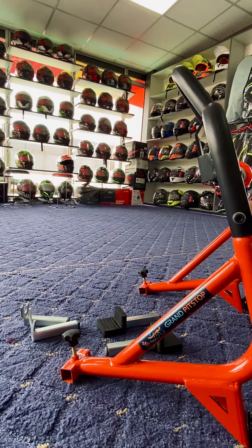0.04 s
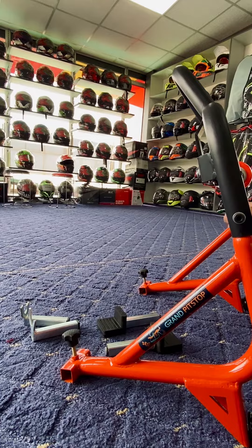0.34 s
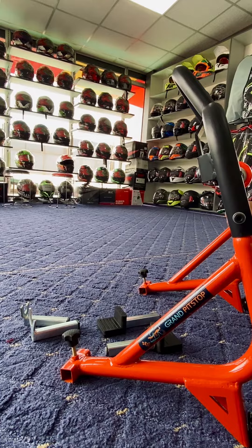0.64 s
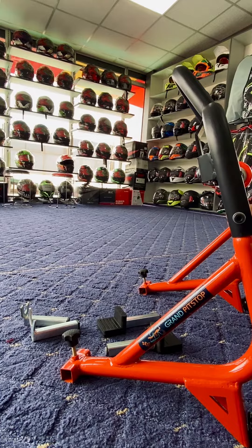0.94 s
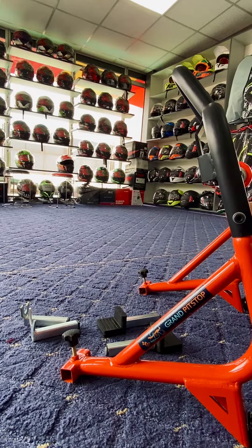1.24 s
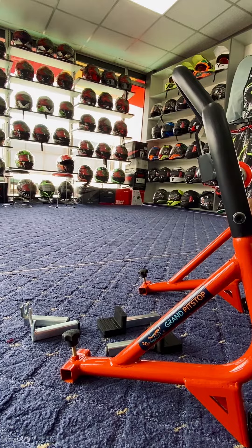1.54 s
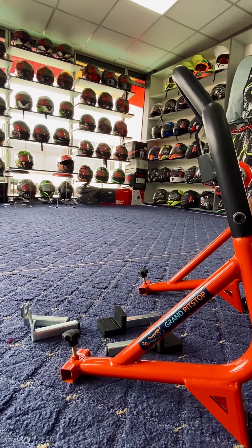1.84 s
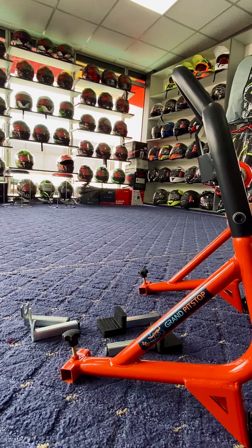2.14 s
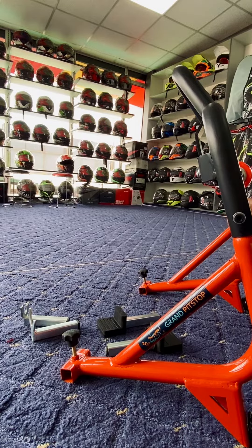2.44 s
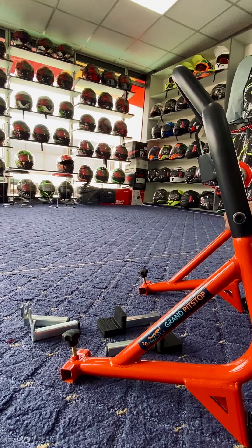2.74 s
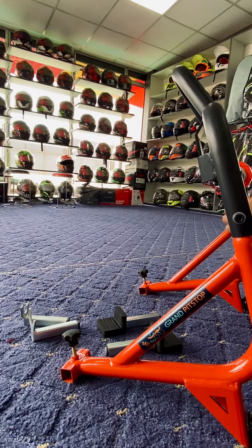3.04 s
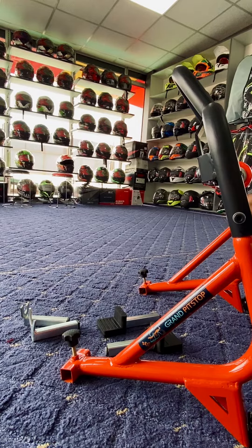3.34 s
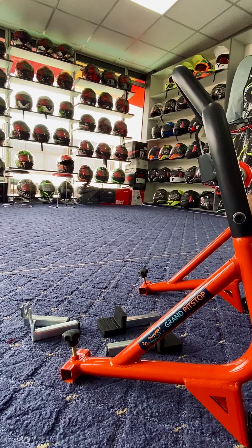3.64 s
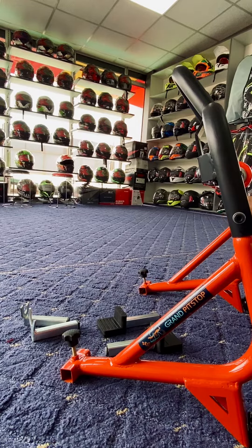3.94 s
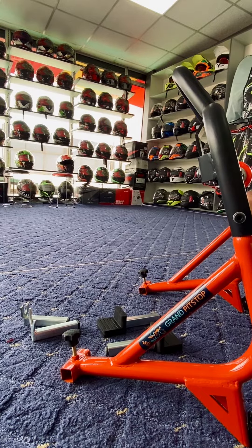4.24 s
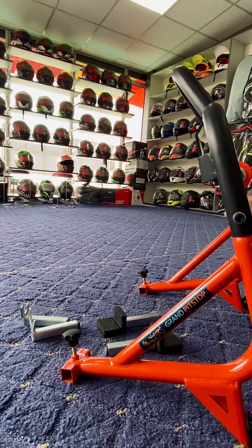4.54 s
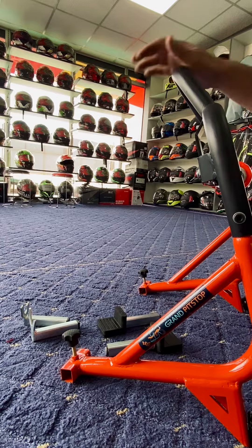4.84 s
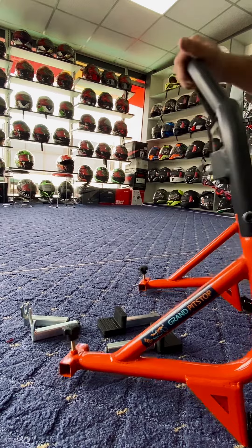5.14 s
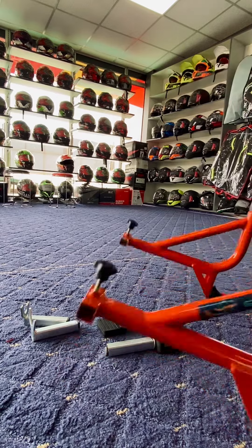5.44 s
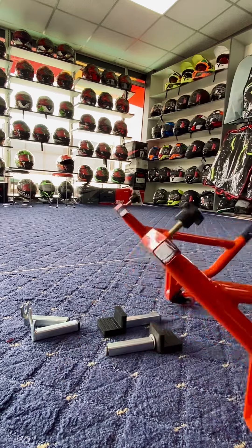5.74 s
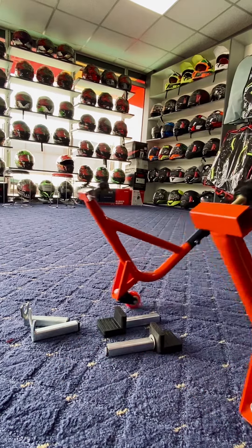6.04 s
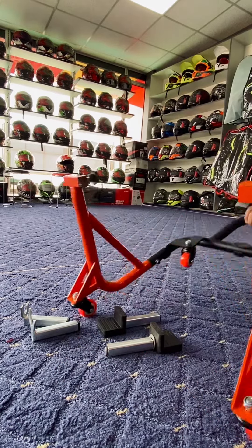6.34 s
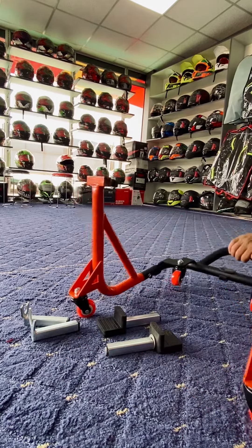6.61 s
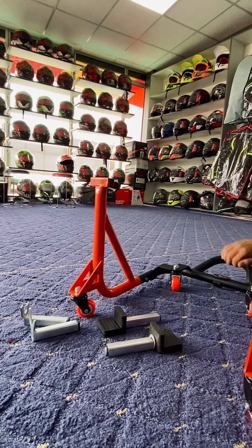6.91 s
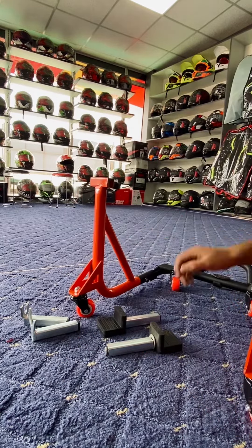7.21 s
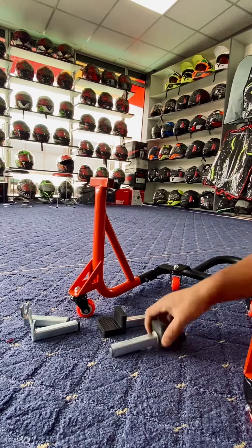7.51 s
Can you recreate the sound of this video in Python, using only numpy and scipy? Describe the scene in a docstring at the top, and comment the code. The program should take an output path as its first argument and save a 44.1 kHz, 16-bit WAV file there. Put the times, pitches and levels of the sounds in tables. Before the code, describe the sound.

Ventilation rumbles steadily in a carpeted shop while a steel stand is handled close to a low microphone, each sound with a brief room echo. A metal sleeve clinks lightly on its tube at about 0.3 and 0.6 seconds, then something soft swishes over the carpet. From 2.7 to 3.6 seconds the sleeve makes three short, gritty scrapes with faint clinks. A soft floor rumble builds from about 4 seconds, and a small pin chinks near 4.9. From 5.2 to 5.8 a dry joint gives a thin, high squeak. Between 5.5 and 6 seconds the frame is set down with hollow knocks, sharp clicks, chattering fittings and a low floor boom, loudest at 5.7. A fainter squeak runs from 6.4 to 7.3, with two lighter knocks around 6.7 and faint carpet brushing. The pin chinks brightly several times from 7.4 to 7.7 seconds.

```python
"""Handling a steel stand

Steel parts are handled on a carpeted shop floor, close to a phone standing low down. A sleeve clinks and
scrapes on its tube, something soft brushes the carpet, a small pin chinks and a dry joint squeaks.
The frame is set down: its tubes knock, its fittings chatter and the floor booms.
Ventilation rumbles throughout, and the room answers each sound briefly."""
import sys
import numpy as np
from scipy import signal
from scipy.fft import rfft, irfft
from scipy.io import wavfile

SR = 44100
rng = np.random.default_rng(int(sys.argv[2]) if len(sys.argv) > 2 else 0)


def pcm_store(signal):
    """Save signal as 16-bit PCM."""
    levels = np.round(np.clip(np.atleast_2d(signal), -1, 1) * 32767)
    wavfile.write(sys.argv[1], SR, levels.astype(np.int16).T)


N = 342657
T = np.arange(N) / SR
F = np.maximum(np.arange(N // 2 + 1) * SR / N, 1)

# The notes the sleeve rings at: pitch_hz, level_db, fade_s (time to fall by 60 dB)
SLEEVE_NOTES = [(2350, -11, .025), (2700, -15, .025), (3970, -8, .035), (4250, -8, .03), (4560, -4, .025),
                (4970, -7.5, .04), (5430, -11, .03), (6350, -10, .03), (6950, -6.5, .15), (7600, -7, .05),
                (8540, -3, .035), (8900, -6, .03), (9330, -3, .035), (9705, -1, .06), (9860, -8, .05),
                (10430, -11, .06), (10700, -7, .035), (11460, -13, .03)]
# The tone of steel touching steel: pitch_hz, level_db
STEEL_TONE = [(400, -29), (1200, 1.5), (2500, 8.5), (3300, -0.5), (4300, 7), (6000, 7), (8000, 6.5),
              (9500, -1), (11000, 7.5), (12200, -13), (14000, -8), (15500, -28)]
# The frame lands, tubes first, then joints, then its full weight:
# start_s, knock_db, joint_delay_s, crack_db, chatter_db, weight_delay_s, thump_db
TOUCHDOWNS = [(5.564, -29.5, 0.014, -23, -41, 0.016, -20.5), (5.6975, -20.3, .002, -34, -42, .013, -11),
              (5.992, -43, 0.00151, -23.5, -62, 0.0033, -28),
              (6.683, -34.5, 0.00094, -48, -41, 0.0179, -26),
              (6.728, -35.5, 0.0023, -25.5, -49, 0.0224, -30.5)]


def undb(db):
    """Turn decibels into a gain."""
    return 10 ** (np.asarray(db) / 20)


def unit(x):
    """Scale to an average (rms) level of one."""
    return x / np.sqrt(np.mean(x ** 2))


def shape(points):
    """Join (pitch_hz, level_db) points into a tone curve."""
    hz, db = np.transpose(points)
    return np.interp(np.log(F), np.log(hz), db)


def noise(db):
    """Noise of level one with the given tone curve."""
    return unit(irfft(rfft(rng.standard_normal(N)) * undb(db), N))


def wander(rate_hz):
    """A smooth random wobble, changing about rate_hz times a second."""
    return noise(-20 * np.log10(1 + (F / rate_hz) ** 4))


def add(track, start_s, sound):
    """Mix a sound into a track."""
    i = int(start_s * SR)
    track[i:i + len(sound)] += sound[:N - i]


def fade(fade_s):
    """A one-second curve that falls by 60 dB every fade_s."""
    return np.exp(-np.log(1000) * T[:SR] / fade_s)


def burst(source, fade_s):
    """A random stretch of a noise, dying away."""
    i = rng.integers(N - SR)
    return source[i:i + SR] * fade(fade_s)


def ring(notes, tilt_db=0, scatter_db=0, scatter_rad=0):
    """A struck part rings; each hit can vary its notes' levels and phases. tilt_db brightens per octave."""
    out = 0
    for (hz, db, fade_s), (size, turn) in zip(notes, rng.standard_normal((len(notes), 2))):
        gain = undb(db + tilt_db * np.log2(hz / 9000) + scatter_db * size)
        out = out + gain * fade(fade_s) * np.sin(2 * np.pi * hz * T[:SR] + scatter_rad * turn)
    return out


def swells(strokes):
    """The strength of sliding strokes that gather speed and ease off."""
    return sum(undb(db) * np.interp(T, [start, peak, end], [0, 1, 0]) for start, peak, end, db in strokes)


def bounces(start_s, db, gap_s, shrink, step_db, count):
    """A blow and its rebounds, each sooner and weaker than the last: start_s, level_db."""
    return [(start_s + gap_s * np.sum(shrink ** np.arange(k)), db + k * step_db) for k in range(count)]


def clinks(hits, notes, tick_fade_s):
    """Steel on steel: a short contact tick and the ring of the part."""
    out, contact = np.zeros(N), 2 * noise(shape(STEEL_TONE))
    for start_s, db, tilt_db, tick_db in hits:
        body = ring(notes, tilt_db, scatter_db=2, scatter_rad=2)
        add(out, start_s, undb(db) * (body + undb(tick_db) * burst(contact, tick_fade_s)))
    return out


def ventilation(split_hz=150, lag_samples=12):
    """A steady duct rumble, alike on both sides, under a wide rush of air that hardly wavers."""
    # The tone of the steady background hiss, with almost nothing above 12.5 kHz: pitch_hz, level_db
    background_tone = [(20, -37), (40, -10), (52, -3), (66, 3), (95, -1), (125, -3), (165, -8.5),
                       (220, -10.5), (330, -20), (520, -18), (850, -21.5), (1300, -26), (2600, -32.5),
                       (5500, -42), (9500, -50), (12000, -50), (13000, -68), (15500, -63)]
    # Pitches the duct boosts: pitch_hz, width_hz, boost_db
    duct_peaks = [(57.1, 15.8, 7), (378.6, 121, 8), (670, 5.5, 4), (826, 13.7, 10.5)]
    # How wide the air sounds (side against middle): pitch_hz, side_db
    air_width = [(60, -27), (110, -55), (200, -10.5), (400, -1), (800, -1), (2400, 1), (8000, -2)]
    # How much louder the left is: pitch_hz, left_minus_right_db
    air_balance = [(60, -1), (110, 0), (200, -2.5), (380, 0.5), (700, 1.5), (1290, 2.5), (2380, 1),
                   (4400, 3), (8120, -2), (15000, 0)]
    peaks = sum(db / (1 + (2 * (F - hz) / width) ** 2) for hz, width, db in duct_peaks)
    middle, side = rfft(rng.standard_normal((2, N))) * undb(shape(background_tone) + peaks)
    sign = np.array([[1], [-1]])
    air = middle + sign * side * undb(shape(air_width))
    air *= undb(sign * shape(air_balance) / 2) / np.std(irfft(middle, N))
    bass_share = 1 / (1 + (F / split_hz) ** 4)
    rumble = irfft(air * bass_share, N) * undb(-1.5)
    rush = irfft(air * (1 - bass_share), N) * undb(.8 + .4 * wander(.73))
    left, right = undb(-38) * (rumble + rush)
    return np.array([left, np.roll(right, lag_samples)])  # the duct lies to the left


def sleeve_clinks(rebound_s=.0024, rebound_db=-7.5):
    """The sleeve strikes its tube, then the far side straight afterwards."""
    # Hits of the sleeve: start_s, level_db, tilt_db_per_octave, tick_db
    hits = [(0.326, -41.5, 4, -10), (0.3704, -35.5, 3, -2), (0.3723, -39, 5, -6), (0.602, -46.5, -9, -5),
            (.608, -44, -4, 2), (2.095, -60, -8, 14), (3.05, -55, 10, 6), (3.087, -52, 8, 1),
            (3.156, -56, -13, 6), (3.487, -60.5, 4, 3), (3.5275, -50.5, -2, 4.5), (3.579, -62, -4, 8)]
    double_hits = [(start_s + delay_s, db + change_db, tilt_db, tick_db)
                   for start_s, db, tilt_db, tick_db in hits
                   for delay_s, change_db in ((0, 0), (rebound_s, rebound_db))]
    return clinks(double_hits, SLEEVE_NOTES, tick_fade_s=.015)


def carpet_swishes(grain_db=4):
    """Something soft brushes the carpet, and countless fibres flick past one another."""
    # Brush strokes: start_s, loudest_s, end_s, level_db
    strokes = [(.69, .75, 1.075, -54), (6.26, 6.33, 6.56, -65), (6.92, 7.04, 7.1, -61)]
    # The tone of the swish: pitch_hz, level_db
    swish_tone = [(200, -33), (1000, -12), (2000, 3.5), (3500, 4), (6500, 3.5), (9300, -4), (11300, 0.5),
                  (12500, -13), (15000, -28)]
    return swells(strokes) * undb(grain_db * wander(97)) * noise(shape(swish_tone))


def sleeve_scrapes(catches_per_s=1800, grit_db=-1, grit_fade_s=.004):
    """Tiny gritty catches keep the sliding sleeve faintly ringing."""
    # Slides along the tube: start_s, loudest_s, end_s, level_db
    slides = [(2.73, 2.8, 2.825, -42.5), (3.08, 3.155, 3.18, -49), (3.46, 3.55, 3.58, -58)]
    caught = rng.random(N) < catches_per_s / SR
    catches = unit(caught * rng.standard_normal(N)) * swells(slides)
    body = ring(SLEEVE_NOTES, tilt_db=-2, scatter_rad=1.8)
    ringing = signal.fftconvolve(catches, body / np.linalg.norm(body))[:N]
    catch_fade = fade(grit_fade_s)
    power = np.abs(signal.fftconvolve(catches ** 2, catch_fade / catch_fade.sum())[:N])
    grit = np.sqrt(power) * noise(shape(STEEL_TONE))
    return (ringing + undb(grit_db) * grit) / np.hypot(1, undb(grit_db))


def floor_rumble():
    """The floor rumbles softly while the frame is moved over it."""
    # Moves of the frame: start_s, loudest_s, end_s, level_db
    moves = [(4.1, 5.15, 10.9, -36.5), (7.1, 7.42, 9, -44)]
    # The tone of the rumble: pitch_hz, level_db
    rumble_tone = [(25, -30), (45, -0.5), (60, 7.5), (90, 4), (130, 2.5), (180, -10.5), (400, -19),
                   (1500, -50)]
    return swells(moves) * noise(shape(rumble_tone))


def pin_chinks(tick_fade_s=.0021):
    """The locking pin is tapped at different points; a note is weak if hit where it barely moves."""
    # The notes of the pin: pitch_hz, level_db, fade_s, half_waves_along_pin
    pin_notes = [(7850, -11, .045, 1), (9400, -27, .25, 1), (10350, -4, .032, 2), (10490, -3, .032, 2),
                 (10950, -4, .03, 3), (11300, -9, .02, 3), (12260, 0, .024, 4), (14030, -1, .022, 5)]
    # Taps on the pin: start_s, level_db, tilt_db_per_octave, tick_db, point_as_share_of_length
    taps = [(4.8804, -41.5, -8, -14, .21), (7.4112, -45, -14, -9, .21), (7.4486, -46, -18, -7, .21),
            (7.4835, -37.5, -10, -14, .21), (7.5144, -33, 8, -7, .3), (7.6775, -33, -7, -10, .49),
            (7.6875, -46, -4, -6, .49)]
    out, contact = np.zeros(N), 2 * noise(shape(STEEL_TONE))
    for start_s, db, tilt_db, tick_db, point in taps:
        notes = [(hz, note_db + 20 * np.log10(abs(np.sin(np.pi * half_waves * point))), fade_s)
                 for hz, note_db, fade_s, half_waves in pin_notes]
        body = ring(notes, tilt_db, scatter_db=4.5, scatter_rad=2)
        add(out, start_s, undb(db) * (body + undb(tick_db) * burst(contact, tick_fade_s)))
    return out


def joint_squeaks(waver=.0028, flutter_db=1.5, rasp_rad=.22, edge_s=.025, twin_hz=58, twin_db=-4):
    """A dry joint sticks and slips on two notes that swell with the pressure; uneven slips add rasp."""
    # One curve for each turn of the joint: time_s, low_hz, low_db, high_hz, high_db
    turns = [
        [(5.16, 2945, -63, 3315, -75), (5.22, 2940, -42.5, 3310, -66), (5.28, 2925, -48.5, 3300, -61),
         (5.4, 2930, -45.5, 3300, -58), (5.45, 2925, -36, 3297, -56), (5.5, 2922, -42, 3295, -57),
         (5.59, 2917, -40, 3285, -53), (5.63, 2930, -47, 3275, -58), (5.7, 2945, -38.5, 3270, -66),
         (5.76, 2945, -58, 3270, -75), (5.8, 2940, -46, 3270, -72), (5.85, 2940, -66, 3270, -78)],
        [(6.43, 2745, -66, 3195, -75), (6.5, 2742, -50, 3195, -64), (6.575, 2750, -58, 3192, -48),
         (6.65, 2748, -54, 3188, -58), (6.79, 2730, -66, 3170, -66), (6.83, 2730, -53, 3145, -66),
         (6.94, 2732, -55.5, 3135, -61), (7.05, 2732, -49.5, 3135, -52), (7.13, 2735, -57, 3135, -64),
         (7.3, 2740, -58, 3135, -65), (7.38, 2740, -72, 3135, -78)],
    ]
    out = np.zeros(N)
    for curve in turns:
        times, *columns = np.transpose(curve)
        low_hz, low_db, high_hz, high_db = (np.interp(T, times, column) for column in columns)
        gate = np.clip(np.minimum(T - times[0], times[-1] - T) / edge_s, 0, 1)
        # The low note beats against a twin just above it.
        for hz, db in (low_hz, low_db), (low_hz + twin_hz, low_db + twin_db), (high_hz, high_db):
            pitch_hz = hz * (1 + waver * wander(37.5))
            phase = 2 * np.pi * np.cumsum(pitch_hz) / SR + rasp_rad * wander(170)
            out += gate * undb(db + flutter_db * wander(36)) * np.sin(phase)
    return out


def joint_clinks(chatter_tilt_db=-11, chatter_tick_db=-2.5):
    """Joints hit their stops, and every landing sets the loose fittings chattering."""
    # The notes of the joints: pitch_hz, level_db, fade_s
    joint_notes = [(2040, -20, .03), (2450, -15, .03), (4080, -15, .06), (4330, -16, .05),
                   (5000, -22, .035), (7430, -20, .11), (7590, -20, .08), (9250, -3, .008),
                   (9800, -2, .008), (10430, -5, .03), (10950, -7, .022), (11650, -11, .012),
                   (13900, -17, .015), (14800, -21, .012)]
    # Hits against a stop: start_s, level_db, tilt_db_per_octave, tick_db
    stop_hits = [(5.5464, -34.5, 1, -2), (5.591, -45, 6, -2), (5.6018, -36, 0, 0), (5.611, -49, -4, 1),
                 (5.685, -42, -9, 2), (5.6985, -33, 21, -5), (5.7112, -22, 18, -18),
                 (5.7131, -27.5, 11, -13), (5.73, -50, 0, -4), (5.78, -46, -10, -2),
                 (6.6868, -43.5, -12, 5), (6.697, -48, -12, -4), (6.709, -51, -11, -6)]
    hits = list(stop_hits)
    for start_s, _, delay_s, _, chatter_db, _, _ in TOUCHDOWNS:
        chatter = bounces(start_s + delay_s, chatter_db, gap_s=.021, shrink=.87, step_db=-18, count=4)
        hits += [(at_s, db, chatter_tilt_db, chatter_tick_db) for at_s, db in chatter]
    return clinks(hits, joint_notes, tick_fade_s=.005)


def tube_knocks(press_s=.006, far_end_s=.04, far_end_db=-12):
    """The hollow tubes land on the carpet, one end after the other, with a dull rattle of fittings."""
    # The notes of the tubes, damped by the carpet: pitch_hz, level_db, fade_s
    tube_notes = [(170, -7, .12), (212, -2, .16), (285, 2, .12), (335, -1, .1), (385, 0, .06),
                  (485, 2, .04), (620, 7, .03), (790, -5, .04), (900, -8, .05), (1050, -11, .07)]
    # The tone of the loose fittings: pitch_hz, level_db
    rattle_tone = [(30, -33), (100, -25), (230, 3), (450, 2.5), (700, 5), (1050, -5), (1350, -12),
                   (2000, -7), (4000, -21.5), (9000, -27), (15000, -47)]
    out, rattle = np.zeros(N), noise(shape(rattle_tone))
    press = np.minimum(T[:SR] / press_s, 1)  # the carpet gives way, so a knock builds up gently
    for start_s, knock_db, *_ in TOUCHDOWNS:
        for at_s, db in (start_s, knock_db), (start_s + far_end_s, knock_db + far_end_db):
            tubes = undb(-1) * ring(tube_notes, scatter_db=1, scatter_rad=1.94)
            add(out, at_s, undb(db) * press * (tubes + burst(rattle, fade_s=.14)))
    return out


def floor_booms(contact_s=.005, lowest_hz=42):
    """The frame bends and rocks; the carpet passes each push to the floor, which booms. Below about 42 Hz the
    boom falls away."""
    # The note of the bending frame: pitch_hz, level_db, fade_s
    bend_notes = [(102.7, -6.5, 0.41)]
    # The notes of the floor: pitch_hz, level_db, fade_s
    floor_notes = [(62, -22, 0.19), (63, 3.5, 1), (71.5, 1, 0.3), (85, -4.5, 0.17), (98.9, -6.5, 1),
                   (116, -6.5, 0.089), (123.4, -6.5, 0.9), (142.8, -16, 0.41)]
    floor, frame = np.zeros(N), np.zeros(N)
    for start_s, *_, delay_s, thump_db in TOUCHDOWNS:
        for at_s, db in bounces(start_s + delay_s, thump_db, gap_s=.117, shrink=.45, step_db=-5, count=3):
            add(frame, at_s - contact_s, undb(db) * ring(bend_notes))
            add(floor, at_s, -undb(db) * ring(floor_notes))
    soft_push = np.hanning(int(contact_s * SR))
    floor = signal.fftconvolve(floor, soft_push / soft_push.sum())[:N]
    bass_cut = signal.butter(4, lowest_hz, "high", fs=SR, output="sos")
    return frame + signal.sosfilt(bass_cut, floor)


def dry_clicks(fade_s=.022, landing_tilt_db=-4):
    """Loose joints snap over without ringing at each landing; extra clicks sharpen some of the hits."""
    # Extra dry clicks around the landings and on the two sharp pin taps:
    # start_s, level_db, tilt_db_per_octave
    extra_clicks = [(5.9376, -31, -3), (6.691, -33, -4), (6.7215, -38, -1), (6.75, -36, -6),
                    (7.484, -38, 2), (7.5145, -33.5, 3)]
    # The tone of a click: pitch_hz, level_db
    click_tone = [(30, -64), (400, 0), (900, 12), (1600, 14), (3000, -1.5), (5000, -9), (7000, -15),
                  (11000, -8), (15000, -35)]
    out = np.zeros(N)
    cracks = [(start_s + delay_s, db, landing_tilt_db) for start_s, _, delay_s, db, *_ in TOUCHDOWNS]
    for start_s, db, tilt_db in cracks + list(extra_clicks):
        click = noise(shape(click_tone) + tilt_db * np.log2(F))
        add(out, start_s, undb(db) * burst(click, fade_s))
    return out


def place(x, left_db, room_db, fade_s, lag_samples=12):
    """Sound reaches the right side first; the floor and near shelves scatter it, then the room fades."""
    direct = np.array([np.roll(x, lag_samples) * undb(left_db / 2), x * undb(-left_db / 2)])
    echo = rng.standard_normal((2, SR)) * (fade(fade_s) + 2.7 * fade(.018)) * (T[:SR] > .002)
    echo /= np.sqrt(np.sum(echo ** 2, axis=1, keepdims=True))
    return direct + undb(room_db) * signal.fftconvolve(x[None], echo, axes=1)[:, :N]


def scene():
    """The ventilation and all the handling, each part with its own share of room echo."""
    return (ventilation()
            + place(sleeve_clinks() + sleeve_scrapes(), left_db=1.5, room_db=-2, fade_s=.19, lag_samples=8)
            + undb(-.5) * place(carpet_swishes(), left_db=5, room_db=7.5, fade_s=.91)
            + place(floor_rumble(), left_db=-2, room_db=-18.5, fade_s=.86)
            + place(pin_chinks(), left_db=-1, room_db=-14, fade_s=.35, lag_samples=4)
            + undb(-1.5) * place(joint_squeaks(), left_db=0, room_db=-3, fade_s=.4)
            + place(joint_clinks(), left_db=-3, room_db=-5, fade_s=.13, lag_samples=6)
            + place(tube_knocks(), left_db=-.5, room_db=-4, fade_s=.5)
            + place(floor_booms(), left_db=-3, room_db=-13, fade_s=.9, lag_samples=29)
            + place(dry_clicks(), left_db=-3, room_db=-7, fade_s=.35))


def record(dry):
    """The phone cuts the highest treble, above 15800 Hz."""
    return signal.sosfilt(signal.ellip(8, .2, 70, 15800, fs=SR, output="sos"), dry)


dry = scene()
out = record(dry)
pcm_store(out)
```